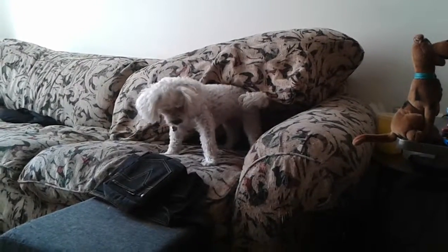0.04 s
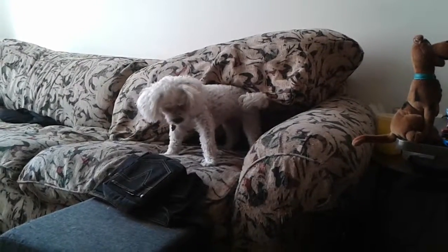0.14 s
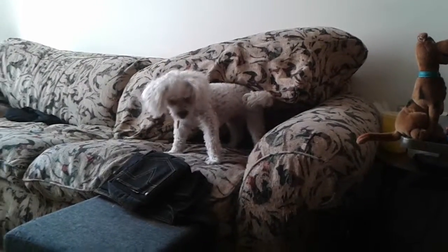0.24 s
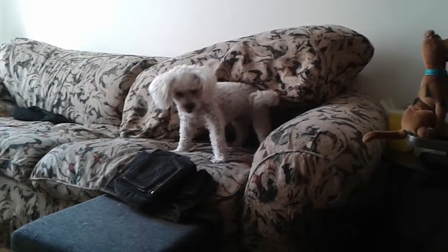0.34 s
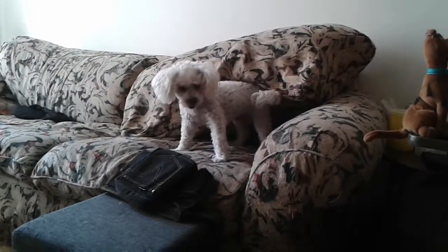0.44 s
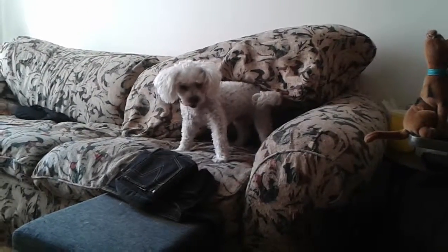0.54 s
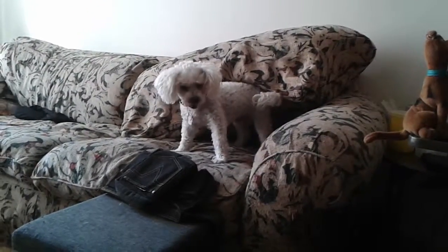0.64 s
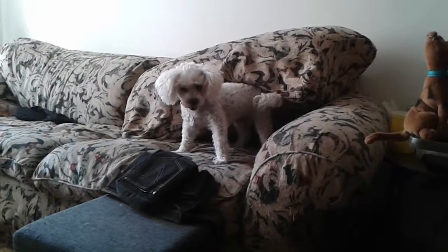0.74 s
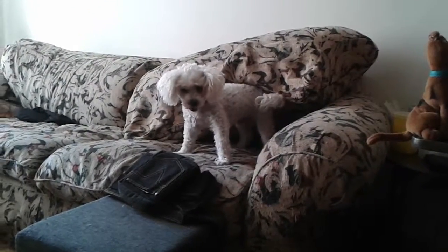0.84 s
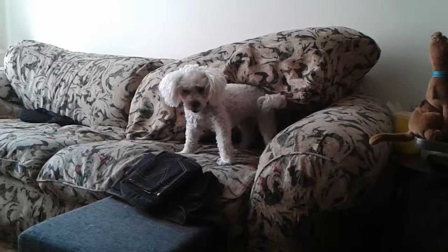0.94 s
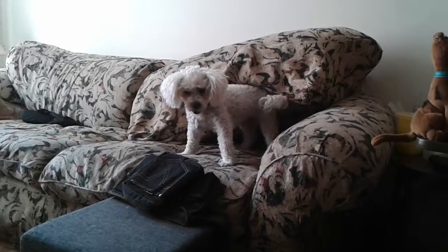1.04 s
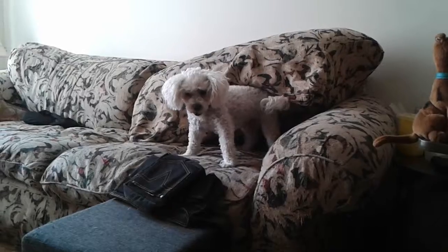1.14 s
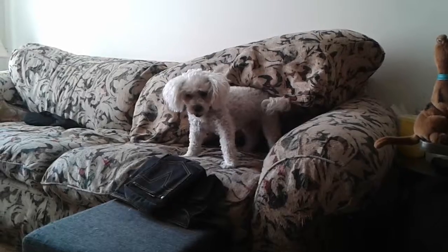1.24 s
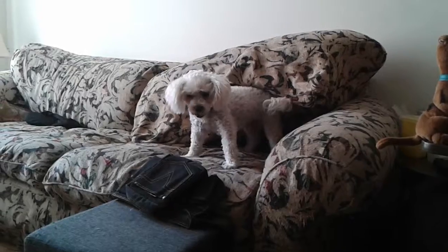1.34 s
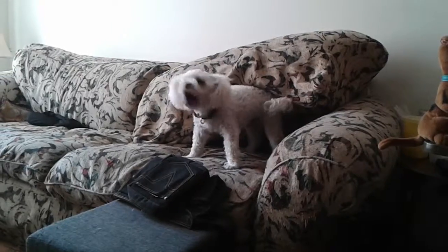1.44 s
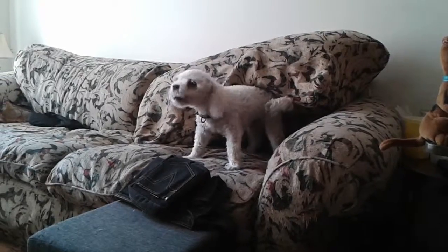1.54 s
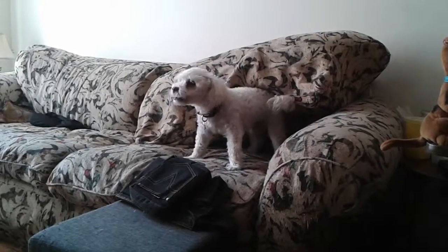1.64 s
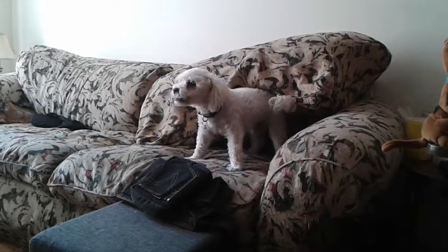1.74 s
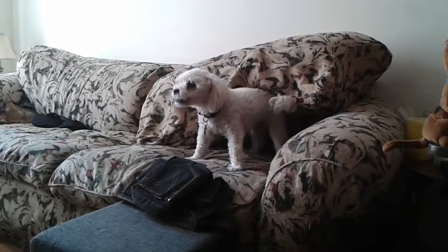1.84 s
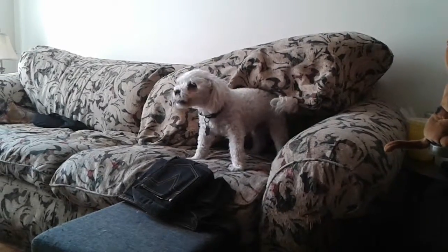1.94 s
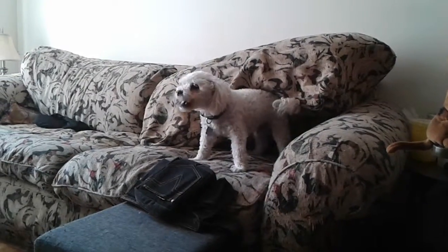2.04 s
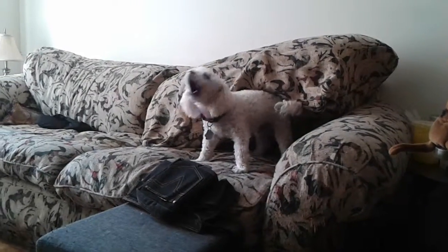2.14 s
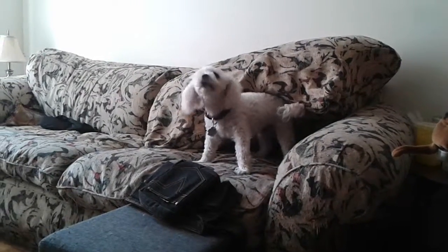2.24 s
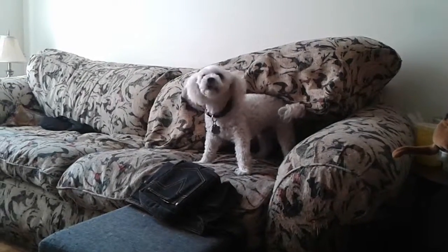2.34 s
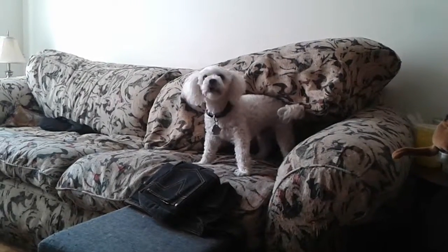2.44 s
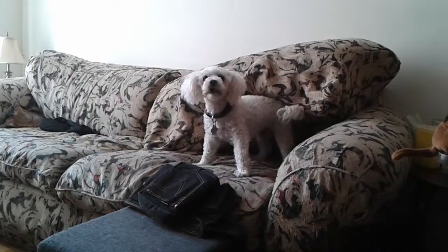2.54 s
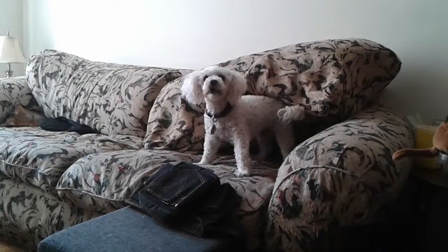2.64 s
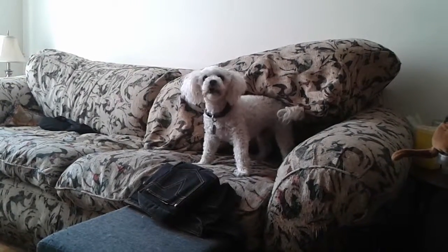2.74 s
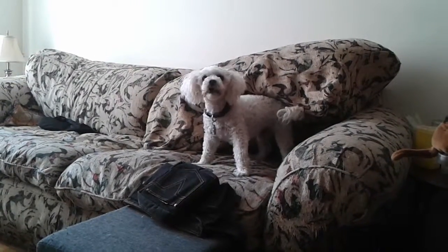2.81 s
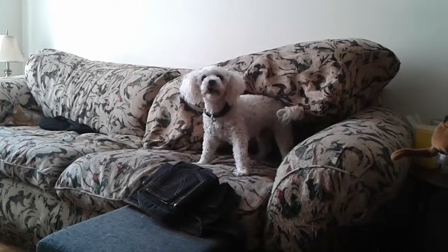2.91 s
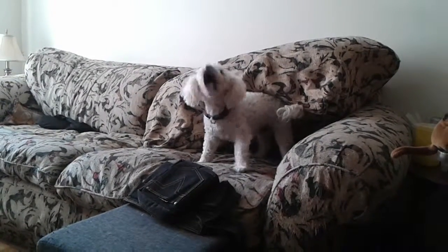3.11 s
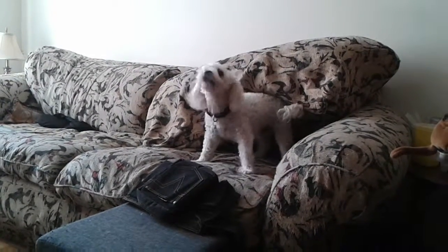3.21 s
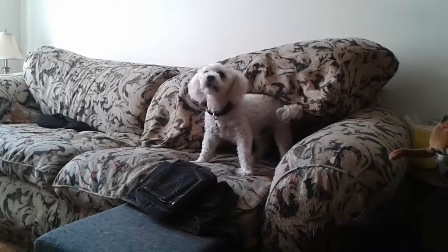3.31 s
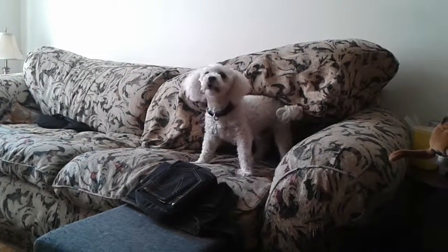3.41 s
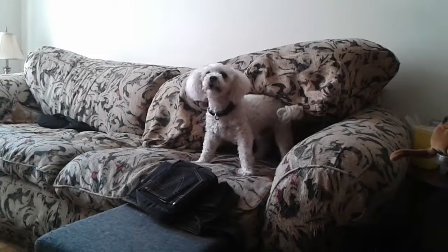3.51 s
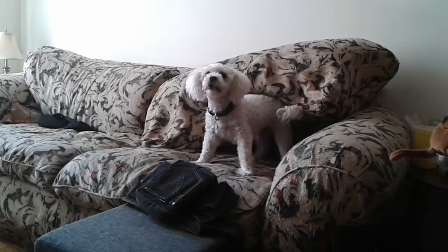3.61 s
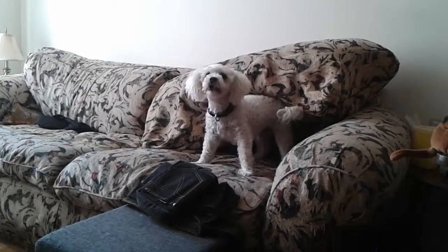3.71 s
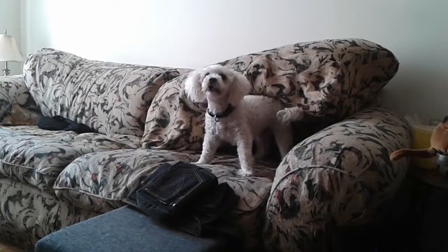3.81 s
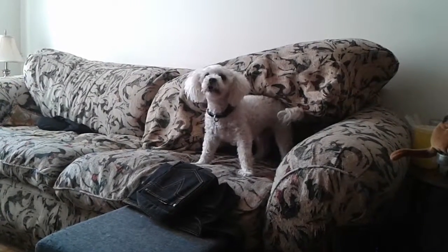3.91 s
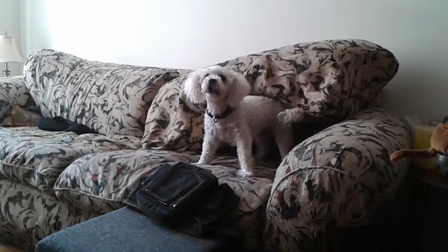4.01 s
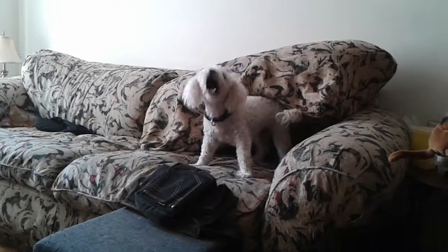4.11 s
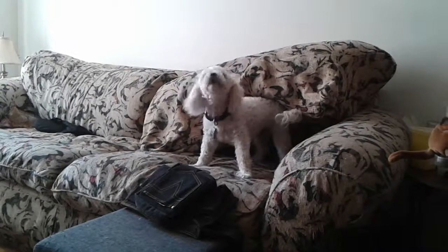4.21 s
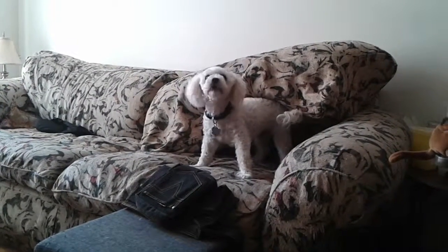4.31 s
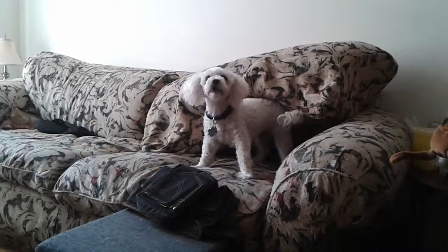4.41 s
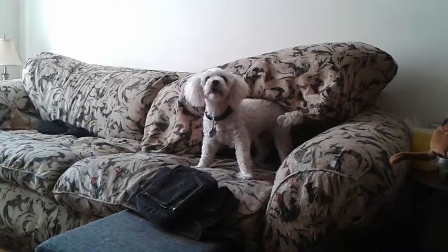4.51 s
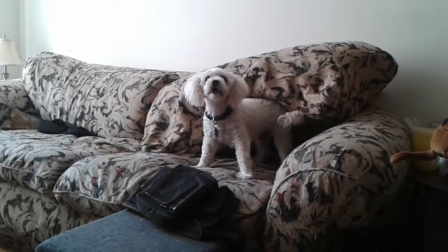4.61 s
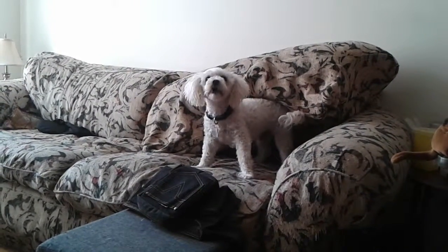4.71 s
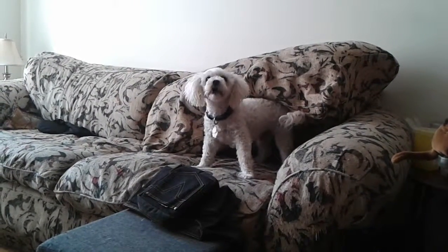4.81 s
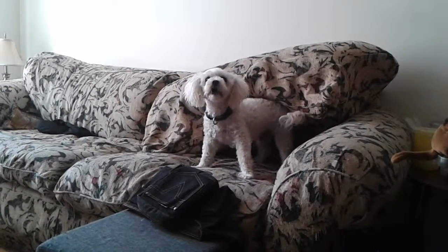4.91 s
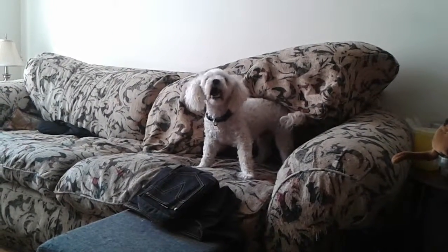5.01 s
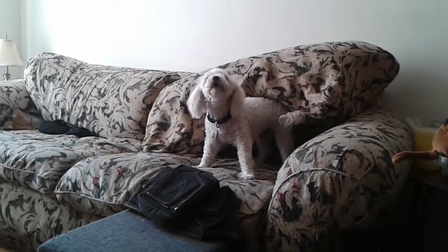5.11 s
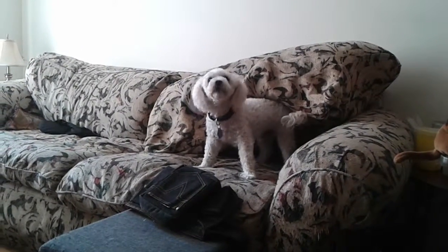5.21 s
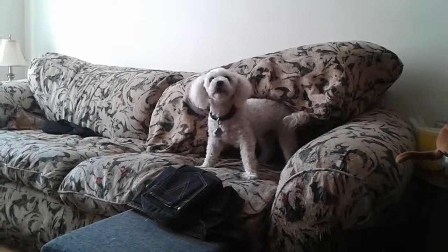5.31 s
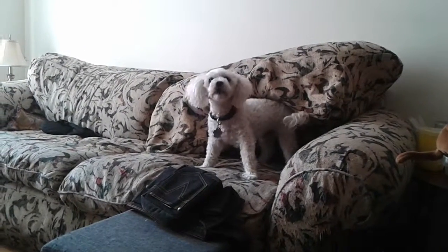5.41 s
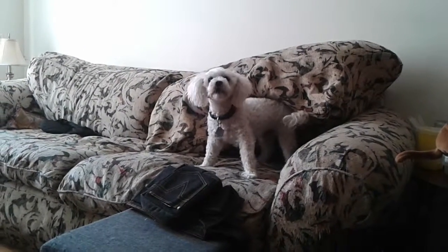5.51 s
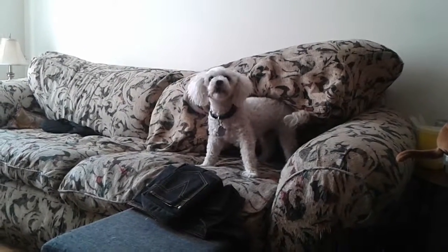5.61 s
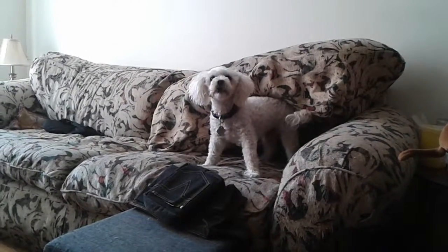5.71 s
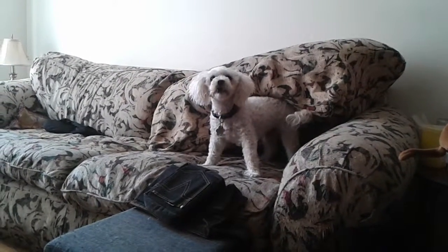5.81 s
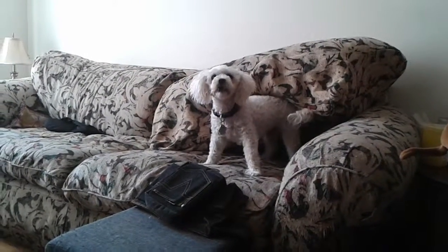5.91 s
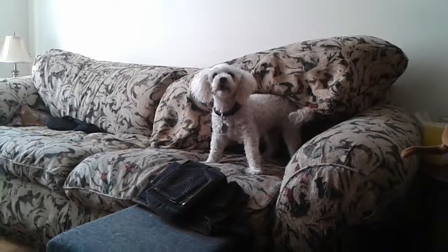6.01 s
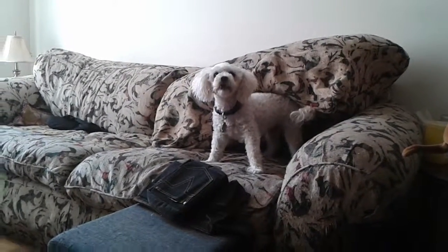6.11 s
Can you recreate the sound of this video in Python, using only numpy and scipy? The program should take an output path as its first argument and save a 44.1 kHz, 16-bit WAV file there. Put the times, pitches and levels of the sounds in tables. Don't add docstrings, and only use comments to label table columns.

```python
import sys
import numpy as np
from scipy import signal
from scipy.fft import rfft, irfft
from scipy.io import wavfile
from scipy.ndimage import uniform_filter1d

SR = 44100
rng = np.random.default_rng(int(sys.argv[2]) if len(sys.argv) > 2 else 0)


def dump_mix(stems):
    frames = np.atleast_2d(stems).T
    limited = np.clip(frames, -1, 1)
    pcm = np.round(limited * 32767).astype(np.int16)
    wavfile.write(sys.argv[1], SR, pcm)


def decibels_to_gain(level_db):
    exponent = np.asarray(level_db, float) / 20
    return 10 ** exponent


N = 271199


def evened(x):
    return x / np.sqrt(np.mean(x ** 2) + 1e-20)


def read(points, hz):
    f, value = np.transpose(points)
    return np.interp(np.log(hz + 1), np.log(f + 1), value)


def add(mix, start_s, sound):
    part = mix[round(start_s * SR):][:len(sound)]
    part += sound[:len(part)]


def unroll(rows):
    time_s, *columns = np.transpose(rows)
    t = np.arange(time_s[0], time_s[-1], 1 / SR)
    return time_s[0], [np.interp(t, time_s, c) for c in columns]


def coloured(gain, size):
    spectrum = rfft(rng.standard_normal(size)) * gain(np.fft.rfftfreq(size, 1 / SR))
    return evened(irfft(spectrum, size))


def wobble(size, span):
    return evened(uniform_filter1d(uniform_filter1d(rng.standard_normal(size), span), span))


def arch(u, peak_at):
    return np.sin(np.pi * u ** (np.log(.5) / np.log(peak_at)))


# pitch_hz, likeness (-1 to 1)
LIKENESS = [(60, .96), (250, .95), (600, .6), (1500, -.2), (4800, .05), (14500, 0)]


def paired(a, b, hz):
    same = np.clip(read(LIKENESS, hz), -1, 1)[:, None]
    return np.array([a, same * a + np.sqrt(1 - same ** 2) * b])


# pitch_hz, level_db (per Hz)
HUM = [(18, -56), (30, -9.5), (104, -4), (167, -1.5), (200, -12.5), (234, -7), (497, -10.5), (754, -7.5),
       (1480, -12.5), (2690, -13), (3780, -22.5), (4650, -13), (6030, -29), (13200, -39.5), (15000, -40)]
HUM_DB = -59.5
# pitch_hz, width_hz, level_db (over the hum)
DRONES = [(59.3, 22, -7), (107, 3.3, -15), (179.7, 6, 5.5), (237.8, 30, 2.5)]
# time_s, boost_db
BOOST = [(0, 20), (1.558, 20.5), (1.6, 9), (1.999, 3), (6.2, 3.5)]


def hum():
    frames, hz = N // 512 + 5, np.fft.rfftfreq(2048, 1 / SR)
    a, b, c, d, patches = rng.standard_normal((frames, 1025, 5)).T
    patches = evened(uniform_filter1d(uniform_filter1d(patches, 20, 0), 8, 1))
    drone_power = sum(decibels_to_gain(db + 7) ** 2 / (1 + ((hz - f) / w) ** 2) for f, w, db in DRONES)
    z = paired(a + 1j * b, c + 1j * d, hz)
    z *= decibels_to_gain(read(HUM, hz)[:, None] + 1.3 * patches) * np.sqrt(1 + drone_power)[:, None]
    lean_db = 9.5 * np.exp(-(np.log(hz / 4000 + 1e-9) / 0.11) ** 2)
    z *= decibels_to_gain(np.array([.5, -.5])[:, None, None] * lean_db[:, None])
    noise = evened(signal.istft(z, nperseg=2048, noverlap=1536)[1][:, :N])
    time_s, boost_db = np.transpose(BOOST)
    return decibels_to_gain(HUM_DB + np.interp(np.arange(N) / SR, time_s, boost_db)) * noise


# start_s, level_db, length_s, centre_hz,
# broad_share (0-1)
HUFFS = [(.365, -44, 0.064, 3830, 0.6), (0.727, -38.5, 0.069, 4340, 0.64), (1.374, -34, 0.11, 2630, 0.8),
         (3.597, -45, .025, 2240, 0.3), (3.637, -57.5, 0.09, 2450, 0.28), (4.073, -51.5, .07, 2420, 0.2),
         (4.672, -55, 0.1, 2940, 0.9), (4.684, -47.5, 0.037, 3160, 0.03), (4.959, -59.5, .04, 2510, 0.63),
         (5.082, -47, 0.099, 2520, .95), (4.179, -47, 0.021, 2270, 0.96), (5.531, -62, 0.52, 7800, 0.64),
         (5.948, -58, 0.11, 6280, 0.22)]
# pitch_hz, level_db
BREATH = [(500, -2.5), (1500, 2), (3000, 3), (5000, -2.5), (6200, -23.5), (8500, -17.5), (11000, -32)]
NARROW_HZ, FLARED_HZ = 200, 1800


def huff(start_s, level_db, length_s, centre_hz, broad):
    size, width_hz = round(length_s * SR * 2), NARROW_HZ + FLARED_HZ * broad ** 2

    def colour(f):
        nostril = 1 / (1 + ((f - centre_hz) / width_hz * 2) ** 2)
        return broad * decibels_to_gain(read(BREATH, f)) + 1.5 * (1 - broad) * nostril

    u = np.arange(size) / (length_s * SR)
    swell = np.minimum(u / .15, 1) * np.exp(-2.2 * u ** 2)
    return start_s, decibels_to_gain(level_db) * coloured(colour, size) * swell


def tones(hz, levels_db):
    turns = np.cumsum(hz * (1 + 0.0043 * wobble(len(hz), span=150))) / SR
    sound = sum(decibels_to_gain(db) * np.sin(2 * np.pi * (k + 1) * turns) for k, db in enumerate(levels_db))
    return np.sqrt(2) * sound * signal.windows.tukey(len(hz), .12)


# time_s, pitch_hz, level_db
WHISTLES = [
    [(0.47, 3780, -54.5), (0.518, 3550, -46), (0.64, 3553, -41), (0.682, 3574, -55), (0.702, 3410, -44),
     (0.74, 3570, -59)],
    [(2.83, 3715, -69.5), (2.874, 3743, -64), (2.898, 3610, -65), (3.042, 3520, -58.5),
     (3.118, 3485, -60.5), (3.135, 3610, -83)],
    [(3.79, 3670, -64.5), (3.808, 3552, -57.5), (3.884, 3587, -52.5), (4.0, 3559, -46.5),
     (4.074, 3514, -66), (4.085, 3740, -83)],
    [(5.812, 3480, -63), (5.83, 3410, -66), (5.908, 3361, -60), (5.916, 3442, -63.5), (5.93, 3387, -61),
     (5.95, 3560, -76)],
]
PINCH_DB = [-23.5, 3.5, 5, 8.5]
THIRD_DB, FOURTH_DB = -20, -16


def whistle(rows, pinch_db):
    start_s, (hz, db) = unroll(rows)
    top_db = db + max(pinch_db, -6)
    return start_s, tones(hz, [db, db + pinch_db, top_db + THIRD_DB, top_db + FOURTH_DB])


# start_s, peak_db, pitch_hz, t60_s
CLICKS = [
    (0.972, -25.5, 4510, 0.01),
    (2.0553, -44.5, 3570, 0.0073),
    (2.0878, -48, 4540, 0.0088),
    (2.0989, -44.5, 3860, 0.0042),
    (2.7744, -62.5, 2820, 0.0072),
    (3.7138, -43, 4600, 0.0061),
]


def click(start_s, peak_db, hz, t60_s):
    t = np.arange(1500) / SR
    return start_s, decibels_to_gain(peak_db - 60 * t / max(t60_s, .002)) * np.sin(2 * np.pi * hz * t)


# pitch_hz, level_db
THROAT = [(120, -55.5), (300, -28), (600, -4), (1000, 5.5), (1200, 5), (1450, -7.5), (1950, 0.5),
          (2500, -4), (2900, -13.5), (4200, -19), (5000, -27), (6000, -33), (9000, -55.5), (14000, -73.5)]


def voice(effort_db, hz, rough, half, bright_db):
    rough, size = np.clip(rough, 0, .4), len(hz)
    turns = np.cumsum(hz * (1 + 0.12 * rough * wobble(size, span=40))) / SR
    order = np.arange(1, 61)[:, None] / 2
    share = np.where(order % 1, np.clip(half, 0, 1), 1) * (order * hz < 15000)
    octaves = np.log2(np.clip(order * hz / 1000, .3, 3.5))
    shape_db = read(THROAT, order * hz) + bright_db * octaves
    flutter_db = np.clip(order - 1, 0, 3) * 16.6 * rough * np.tanh(wobble(size, span=60))
    spread = .9 * order ** 2
    lines = share * decibels_to_gain(flutter_db) * decibels_to_gain(shape_db) * np.cos(2 * np.pi * order * turns + spread)
    folds = lines.sum(0)

    def breath(f):
        return decibels_to_gain(read(THROAT, f) + 14.9 * np.log2(f / 1000 + .01)) / (1 + (800 / (f + 1)) ** 9)

    puffs = coloured(breath, size) * (1.3 + np.cos(np.pi * turns) ** 2)
    sound = (1 - rough) * folds + rough * evened(puffs)
    return decibels_to_gain(effort_db - 5.0) * sound * signal.windows.tukey(size, .15)


# start_s, length_s, rise_s, effort_db, pitch_hz
CHEST = [
    (1.534, 0.052, .032, -10, 425.7),
    (2.237, .038, .034, -19.5, 355.7),
    (3.2, 0.05, .028, -18.5, 403.8),
    (4.186, 0.047, 0.035, -16, 394.9),
    (5.127, .072, .05, -18.5, 378.3),
]
CHEST_RISE_DB, CHEST_SLACK = 28.5, .25
CHEST_ROUGH, CHEST_HALF = .21, .25
CHEST_DARK_DB, CHEST_OPEN_DB = -10.5, 0.5


def chest(start_s, length_s, rise_s, effort_db, hz):
    up = np.minimum(np.arange(0, length_s, 1 / SR) / rise_s, 1)
    bright_db = CHEST_DARK_DB + (CHEST_OPEN_DB - CHEST_DARK_DB) * up
    climb_db = effort_db - CHEST_RISE_DB * (1 - up) ** 1.9
    climb_hz = hz * (1 - CHEST_SLACK * (1 - up) ** 1.5)
    return start_s, voice(climb_db, climb_hz, CHEST_ROUGH, CHEST_HALF, bright_db)


# time_s, effort_db, pitch_hz, brightness_db (per octave, mouth opening)
HEAD = [
    [(1.58, -16.5, 1023, 3), (1.6, 0.5, 1095, -0.5), (1.622, -8, 1140, 0), (1.633, -5, 980.6, 3),
     (1.66, -11, 949.2, 9.5), (1.671, -1.5, 867.6, -3.5), (1.69, -26, 630, -13)],
    [(2.255, -31.5, 641, -8.5), (2.273, -7, 910, 0), (2.289, -6.5, 928.7, 5), (2.303, -1, 1150, -13.5),
     (2.32, -8.5, 1120, 2.5), (2.335, -9.5, 968.5, 5.5), (2.36, -8.5, 848, -5.5), (2.385, -31, 609.5, -3.5)],
    [(3.243, -14, 869, 2.5), (3.262, -2, 1078, -1.5), (3.29, -2.5, 1099, -5.5), (3.312, -4.5, 954, 0.5),
     (3.342, -17, 613, -9)],
    [(4.232, -13, 895, 8.5), (4.268, -4.5, 1089, -2.5), (4.298, -6.5, 973, 2), (4.318, -16.5, 737.5, -7),
     (4.34, -31.5, 600, -15)],
    [(5.185, -12, 806, 5), (5.21, -8.5, 1000, 3.5), (5.232, -9, 1000, 7.5), (5.26, -16, 773.5, 0),
     (5.285, -35, 543, -16)],
]
HEAD_ROUGH = [.03, .07, .14, .11, .1]
SLACK_HZ, HALF_PER_OCTAVE = 1000, 0.12


def head(rows, rough):
    start_s, (effort_db, hz, bright_db) = unroll(rows)
    return start_s, voice(effort_db, hz, rough, HALF_PER_OCTAVE * np.log2(SLACK_HZ / hz), bright_db)


# time_s, pitch_hz, level_db
WHINES = [
    [(2.125, 661, -64.5), (2.145, 687, -34), (2.161, 760, -33), (2.197, 864, -41.5), (2.235, 828, -63)],
    [(3.4, 916, -30), (3.482, 914, -24.5), (3.532, 904, -23), (3.562, 912, -32)],
    [(5.94, 896, -56), (5.95, 841, -42), (5.99, 805.5, -35.5), (6.03, 801, -38.5), (6.066, 794, -54),
     (6.14, 812, -54.5)],
]
# leak_db (past the lips), ring_db (nasal, against the first tone)
LIPS_DB = [(-3, -45), (-2, -29), (11, -38)]
# pitch_hz, level_db
MUZZLE = [(1000, -29.5), (1500, -22), (1800, -28.5), (2150, -11), (2400, -26), (2750, -29.5)]
NOSE_HZ, NOSE_WIDTH_HZ = 5100, 1150
OVERTONE_DROP = 0.35


def whine(hz, first_db, leak_db, ring_db):
    over_db = first_db + OVERTONE_DROP * (first_db - first_db.max())
    low_db = [over_db + leak_db + read(MUZZLE, k * hz) for k in range(2, 4)]
    upper_db = []
    for k in range(4, 14):
        off_nose = (k * hz - NOSE_HZ) / NOSE_WIDTH_HZ
        upper_db.append(over_db + ring_db - 12 * np.log10(1 + off_nose ** 6))
    return tones(hz, [first_db, *low_db, *upper_db])


# start_s, length_s, effort_db, first_hz, last_hz
MUTTERS = [
    (4.994, .135, -51.5, 389, 338.6),
    (5.452, 0.11, -50.5, 211.3, 253),
]
MUTTER_ROUGH, MUTTER_DARK_DB = .1, -8


def mutter(start_s, length_s, effort_db, first_hz, last_hz):
    u = np.arange(0, length_s, 1 / SR) / length_s
    swell_db = effort_db - 8 * (1 - arch(u, .4))
    glide_hz = first_hz + (last_hz - first_hz) * u
    return start_s, voice(swell_db, glide_hz, MUTTER_ROUGH, CHEST_HALF, MUTTER_DARK_DB)


# start_s, length_s, level_db, pitch_hz
SOBS = [
    (5.53, 0.097, -39.5, 501),
    (5.607, 0.043, -33.5, 562),
    (5.654, 0.057, -37, 570),
    (5.71, 0.028, -35.5, 620),
    (5.732, 0.083, -39.5, 685),
    (5.813, .047, -50.5, 684),
]
# leak_db, ring_db
SOB_LIPS_DB = (-11, -38)
SOB_CLIMB_HZ_PER_S, SOB_EDGE_DB, SOB_PEAK_AT = 360, -16, 0.38


def sob(start_s, length_s, level_db, hz):
    t = np.arange(0, length_s, 1 / SR)
    swell_db = level_db + SOB_EDGE_DB * (1 - arch(t / length_s, SOB_PEAK_AT))
    return start_s, whine(hz + SOB_CLIMB_HZ_PER_S * t, swell_db, *SOB_LIPS_DB)


# delay_s, level_db
ECHOES = [(.0031, -9), (.0058, -10), (.0094, -11), (.0137, -12), (.019, -15), (.026, -16)]


def reflections(x):
    early = x.copy()
    for delay_s, db in ECHOES:
        add(early, delay_s, decibels_to_gain(db) * x)
    return early


# pitch_hz, level_db
PORT_DB = [(60, -2), (130, -8.5), (290, 4), (630, 0), (1380, 0), (3030, 6), (6630, 5.5), (14500, -19)]
# pitch_hz, phase_rad
PORT_TURN = [(0, 0), (2500, 1), (3010, -12), (3960, -11.5), (9220, -20.5), (11100, -21), (12100, -28),
             (14700, -24.5)]


def ports(x):
    hz = np.fft.rfftfreq(1024, 1 / SR)
    half = decibels_to_gain(read(PORT_DB, hz) / 2) * np.exp(.5j * read(PORT_TURN, hz))
    taps = np.roll(irfft([half, 1 / half]), 512, 1) * np.hanning(1024)
    return signal.oaconvolve(x[None], taps, axes=1)[:, 512:N + 512]


# pitch_hz, t60_s
ROOM = [(300, 0.54), (700, 0.34), (1400, 0.36), (2800, 0.38), (5500, 0.36), (11000, 0.25)]


def room(x):
    taps = np.zeros((2, SR))
    at = np.arange(500, SR - 20, 20) + rng.integers(0, 20, (2, (SR - 501) // 20))
    np.put_along_axis(taps, at, rng.choice([-1., 1.], at.shape), 1)
    hz, t, (a, b) = signal.stft(taps, SR, nperseg=256)
    z = paired(a, b, hz) * decibels_to_gain(-60 * t / read(ROOM, hz)[:, None])
    tail = signal.istft(z, SR, nperseg=256)[1]
    return signal.fftconvolve(x[None], tail / np.linalg.norm(tail[0]), axes=1)[:, :N]


def scene():
    yips, small = np.zeros((2, N))
    for sound in [huff(*row) for row in HUFFS] + [*map(whistle, WHISTLES, PINCH_DB)]:
        add(small, *sound)
    for sound in [click(*row) for row in CLICKS] + [sob(*row) for row in SOBS]:
        add(small, *sound)
    for (start_s, columns), lips_db in zip(map(unroll, WHINES), LIPS_DB):
        add(small, start_s, whine(*columns, *lips_db))
    for sound in [chest(*row) for row in CHEST] + [*map(head, HEAD, HEAD_ROUGH)]:
        add(yips, *sound)
    for row in MUTTERS:
        add(yips, *mutter(*row))
    near = ports(reflections(yips) + small)
    return near + room(decibels_to_gain(-4.0) * yips + decibels_to_gain(-20) * small) + hum()


def band_limit(x):
    return signal.sosfilt(signal.butter(12, 14700, fs=SR, output="sos"), x)


def record(dry):
    dry = signal.sosfilt(signal.butter(6, 50, "high", fs=SR, output="sos"), dry)
    power_db = 10 * np.log10(abs(uniform_filter1d((dry ** 2).mean(0), 300)) + 1e-12)
    fall = np.arange(N) * 72.0 / SR
    held_db = np.maximum.accumulate(power_db + fall) - fall
    over_db = np.maximum(held_db + 14.0, 0)
    ducked = dry / decibels_to_gain(0.49 * uniform_filter1d(over_db, size=200))
    rounded = ducked / (1 + ducked ** 12) ** (1 / 12)
    edged = signal.sosfilt(signal.butter(16, 14900, fs=SR, output="sos"), rounded)
    return band_limit(edged)


dry = scene()
out = record(dry)
dump_mix(out)
```